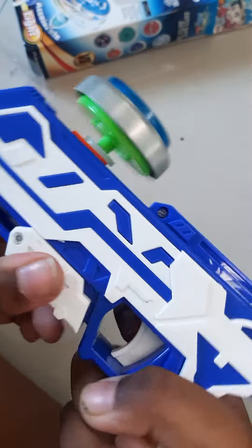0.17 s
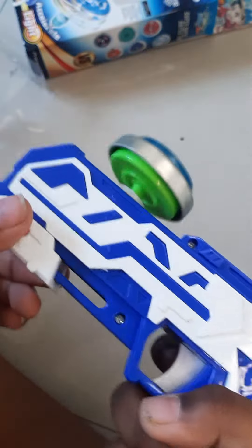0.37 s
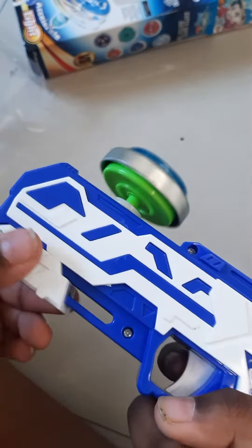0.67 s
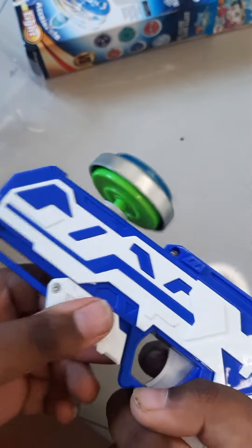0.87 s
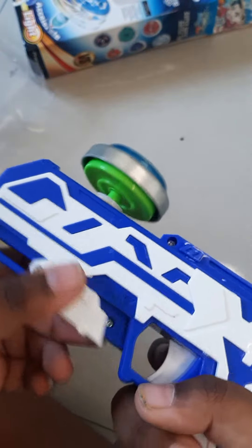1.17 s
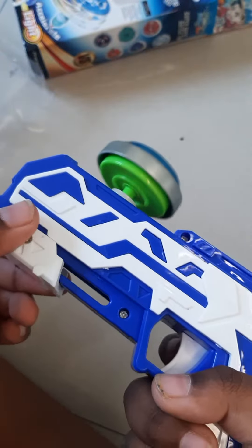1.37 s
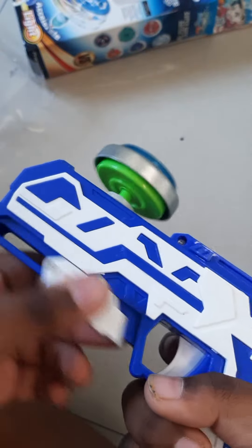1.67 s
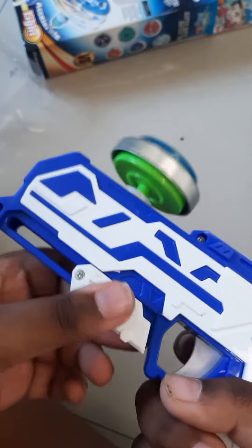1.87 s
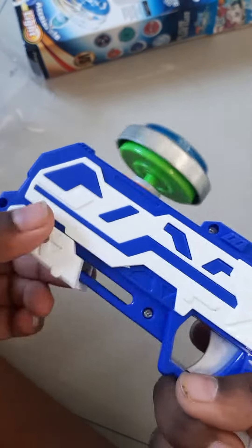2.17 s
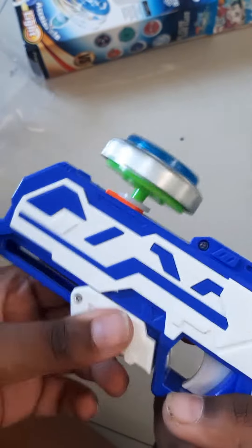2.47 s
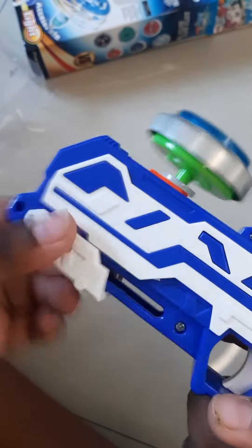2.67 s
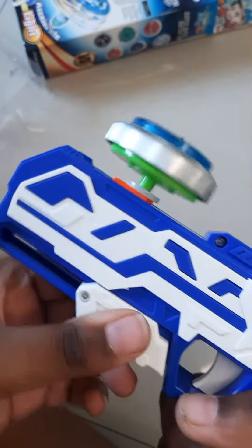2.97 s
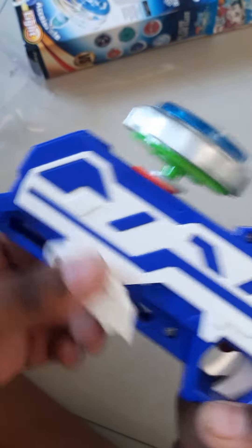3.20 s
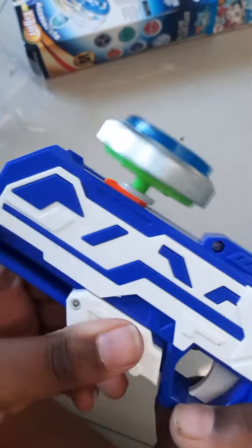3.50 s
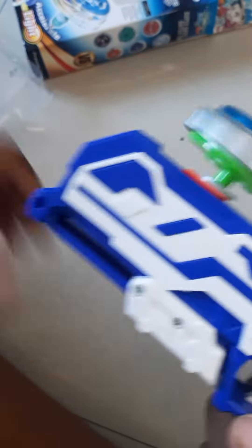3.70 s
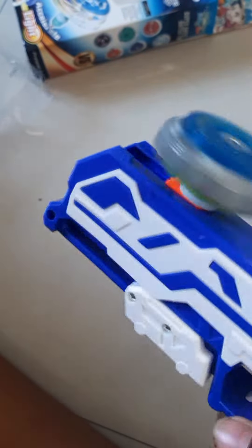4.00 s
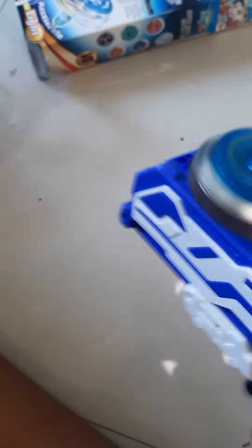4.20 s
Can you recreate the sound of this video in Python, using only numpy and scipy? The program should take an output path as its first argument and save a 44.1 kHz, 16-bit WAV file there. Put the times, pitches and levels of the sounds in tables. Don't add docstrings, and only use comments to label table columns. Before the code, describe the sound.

Close, bright plastic gear grinding and sharp knocks come in quick alternating strokes over the continuous fluttering rattle of a fast spinning top.

```python
import sys
import numpy as np
from scipy import signal
from scipy.fft import rfft, irfft
from scipy.io import wavfile
from scipy.ndimage import uniform_filter1d

SR = 44100
rng = np.random.default_rng(int(sys.argv[2]) if len(sys.argv) > 2 else 0)


def volts_from_decibels(level):
    exponent = np.asarray(level, float) / 20
    return 10 ** exponent


def dump(signal):
    limited = np.clip(np.atleast_2d(signal).T, -1, 1)
    pcm = np.round(limited * 32767).astype(np.int16)
    wavfile.write(sys.argv[1], SR, pcm)


N = 191658

# f/Hz, level per Hz/dB
GEAR_RING = [(400, -24), (900, -14), (1600, -2.5), (2500, 3.5), (4300, 0.5), (7200, 0), (8500, 1.5),
             (11500, -9), (15700, -18)]
# f/Hz, width/Hz, height/dB
RIM_MODES = [(2650, 300, 4), (4880, 380, 8), (5820, 300, 7), (6800, 300, 3), (12000, 500, 2)]
# start/s, stop/s, grind level at start/dB, grind level at stop/dB
PULL_STROKES = [
    (.71, .872, -29.5, -22),
    (1.59, 1.738, -27.5, -21),
    (2.283, 2.406, -27.5, -23),
    (2.865, 2.999, -26, -27.5),
    (3.379, 3.501, -24, -28),
]

PORT_LAG_S = 0.00016
SPOTS = 6
ECHO_DB = -29


def rms_one(x):
    return x / np.sqrt(np.mean(x ** 2) + 1e-20)


def in_time(rows):
    s, *columns = np.transpose(rows)
    t = np.arange(N) / SR
    return [np.interp(t, s, column) for column in columns]


def at_hz(points, hz):
    point_hz, value = np.array(points).T
    return np.interp(np.log(hz + 1), np.log(point_hz), value)


def humps(modes, hz):
    return sum(db / (1 + (2 * (hz - centre) / width) ** 2) for centre, width, db in modes)


def causal(level_db):
    cepstrum = irfft(level_db * np.log(10) / 20)
    half = len(cepstrum) // 2
    cepstrum[1:half] *= 2
    cepstrum[half + 1:] = 0
    return np.exp(rfft(cepstrum))


def two_ports(mid, side, hz, lag_s):
    # f/Hz, likeness (0 to 1)
    likeness = [(40, 0.067), (130, 0.95), (500, 0.82), (1500, 0.93), (2300, 0.79), (3300, 0.75),
                (5500, 0.1), (14000, 0.093)]
    # f/Hz, extra lag/rad
    shadow = [(1700, -0.081), (2250, 0.37), (3000, -0.47), (3900, -0.18), (4600, 0.23)]
    alike = np.clip(at_hz(likeness, hz), 0, 1)
    shared, unlike = np.sqrt(1 + alike) * mid, np.sqrt(1 - alike) * side
    lag_rad = 2 * np.pi * hz * lag_s + (lag_s > 0) * at_hz(shadow, hz)
    return np.array([shared + unlike, (shared - unlike) * np.exp(-1j * lag_rad)])


def shell(clicks, level_db, ring_s, size=8192):
    t = np.arange(size) / SR
    hz = np.arange(size // 2 + 1) * SR / size
    echo = volts_from_decibels(ECHO_DB - 60 * t / 0.27) * np.clip(t / 0.01, 0, 1)
    dying = volts_from_decibels(-60 * t / ring_s) + echo
    out = 0
    for spot in clicks:
        mid, side = rfft(rng.standard_normal((2, size)) * dying)
        ports = two_ports(mid, side, hz, PORT_LAG_S)
        power = np.mean(abs(ports) ** 2, axis=0)
        broad_db = 10 * np.log10(uniform_filter1d(power, size=60))
        colour = causal(level_db(hz) - broad_db)
        out = out + signal.oaconvolve(spot[None], irfft(ports * colour), axes=1)[:, :N]
    return out / np.sqrt(np.mean(volts_from_decibels(level_db(hz)) ** 2))


def grains(per_s, spread_db):
    sizes = volts_from_decibels(spread_db * np.minimum(rng.exponential(1, N), 3.0)) * rng.choice([-1, 1], N)
    born = rng.random(N) < per_s / SR
    dealt = rng.integers(0, SPOTS, N) == np.arange(SPOTS)[:, None]
    return rms_one(sizes * born) * dealt


def slow(rate_hz):
    z = rng.standard_normal(N) + 1j * rng.standard_normal(N)
    z = signal.sosfilt(signal.butter(2, rate_hz, fs=SR, output="sos"), z)
    return z / np.sqrt(np.mean(abs(z) ** 2))


def split(x, low_gain, high_gain):
    out = 0
    parts = ((2700, "low", low_gain), ((2700, 8300), "band", 1), (8300, "high", high_gain))
    for hz, kind, gain in parts:
        band = signal.butter(2, hz, kind, fs=SR, output="sos")
        out = out + signal.sosfilt(band, x * gain + 1e-18)
    return out


def strokes_in_time(tables, silent):
    rows = []
    for table in tables:
        first, last = table[0], table[-1]
        rows += [(first[0] - 0.004, *silent(first)), *table, (last[0] + 0.011, *silent(last))]
    return in_time(rows)


def spinning_top():
    # t/s, turns made so far
    spin = [(0, -0.13), (.2248, 10), (.6156, 25), (.734, 30), (1.0526, 45), (1.1637, 50), (1.6353, 70),
            (1.7467, 75), (1.9479, 85), (2.1757, 95), (2.3862, 105), (2.6723, 120), (2.9683, 135),
            (3.2297, 150), (3.502, 165), (3.7578, 180), (4.0268, 195), (4.35, 212.08)]
    # t/s, rattle level/dB, depth of the once-a-turn beat/dB
    looseness = [
        (0.0, -39, 13.5),
        (0.52, -41, 10),
        (1.5, -40.5, 12),
        (1.8, -36.5, 12),
        (2.15, -39, 12.5),
        (2.52, -40.5, 12.5),
        (3.1, -39.5, 10),
        (3.69, -40.5, 12),
        (3.95, -36.5, 8.5),
        (4.35, -34, 8.5),
    ]
    # f/Hz, level per Hz/dB
    top_ring = [(500, -18), (1000, -8), (1700, -8.5), (2300, -4.5), (3500, 0.5), (4500, -2), (6800, -1),
                (8400, -3.5), (12000, -16), (15700, -22.5)]
    turns, = in_time(spin)
    level_db, beat_db = in_time(looseness)
    turn = np.floor(turns + 0.5).astype(int)
    chance = rng.standard_normal((turn[-1] + 1, 2))[turn]
    late_turns, wander_db = 0.04 * chance[:, 0], 1.2 * chance[:, 1]
    beat = np.exp(1.6 * (np.cos(2 * np.pi * (turns - late_turns)) - 1))
    rub = grains(6000, spread_db=4.5) * volts_from_decibels(beat * (beat_db + wander_db) - 0.23 * beat_db)
    sound = shell(rub, lambda hz: at_hz(top_ring, hz) + humps(RIM_MODES, hz), ring_s=0.0043)
    highs = signal.sosfilt(signal.butter(4, 8500, "high", fs=SR, output="sos"), sound)
    return volts_from_decibels(level_db + 5.0) * (sound + (volts_from_decibels(6.5) - 1) * highs)


def stroke_shape(start, stop, first_db, last_db, sag_db, low_db):
    grind_low_db, stop_low_db, coast_low_db = -12.5, -9, -13.5
    middle_db = (first_db + last_db) / 2 + sag_db
    return [(start, first_db - 1.0, grind_low_db),
            (start + 0.0077, first_db, grind_low_db + low_db),
            ((start + stop) / 2, middle_db, grind_low_db + low_db),
            (stop, last_db, stop_low_db),
            (stop + 0.011, last_db - 5.5, coast_low_db),
            (stop + 0.095, last_db - 34.5, coast_low_db)]


def stroke():
    # start/s, stop/s, grind level at start/dB, grind level at stop/dB
    pushes = [
        (-.03, 0.018, -28, -19),
        (0.244, 0.408, -30, -21.5),
        (1.194, 1.324, -22.5, -20),
        (1.965, 2.056, -32, -20),
        (2.614, 2.717, -28, -24),
        (3.189, 3.276, -26.5, -28),
    ]
    shapes = [stroke_shape(*row, sag_db=1, low_db=2.0) for row in pushes]
    shapes += [stroke_shape(*row, sag_db=-2, low_db=-1.0) for row in PULL_STROKES]
    grind_db, low_db = strokes_in_time(sorted(shapes), lambda row: (-70, row[2]))
    clumps = volts_from_decibels(4.3 * np.clip(np.real(slow(47)), -2.5, 0.6))
    rub = grains(4000, spread_db=9.5) * clumps * volts_from_decibels(grind_db + 5.0)
    rub = split(rub, volts_from_decibels(low_db + 10.5), volts_from_decibels(-2.5))
    return shell(rub, lambda hz: at_hz(GEAR_RING, hz) + 0.017 * humps(RIM_MODES, hz), ring_s=0.025)


def mesh_shape(start, stop, s, hz, db):
    fall_hz_per_s, rise_hz_per_s = 2800.0, 2900
    start, stop = max(start, s - 0.08), max(stop, s + 0.01)
    return [(start, hz + fall_hz_per_s * (s - start), db - 7),
            (s, hz, db),
            (stop, hz + rise_hz_per_s * (stop - s), db + 0.5)]


def mesh():
    # t of slowest moment/s, mesh f there/Hz, level there/dB
    songs = [
        (.792, 1635, -33),
        (1.73, 1413, -39),
        (2.395, 1515, -29.5),
        (2.93, 1460, -33),
        (3.44, 1570, -32.5),
    ]
    shapes = [mesh_shape(*pull[:2], *song) for pull, song in zip(PULL_STROKES, songs)]
    hz, level_db = strokes_in_time(shapes, lambda row: (row[1], -80))
    phase = 2 * np.pi * np.cumsum(hz) / SR
    phase = np.array([phase, phase - 2 * np.pi * hz * PORT_LAG_S])
    first = (0.3 + slow(90)) * np.exp(1j * phase)
    second = volts_from_decibels(-3.5) * slow(250) * np.exp(1.4j * phase)
    return volts_from_decibels(level_db + 4) * np.real(first + second)


def jolts():
    # t of crest/s, level/dB, chatter length/ms
    skips = [(.274, -12.5, 4.6), (.314, -11.5, 12), (.33, -0.5, 2.6), (.3518, -1, 7.4), (.3649, -4, 9.4),
             (.3866, -2, 5), (1.2062, -9, 7.7), (1.2352, -6.5, 5.7), (1.2462, -7.5, 5), (1.2637, -7.5, 6.1),
             (1.284, -5, 2.8), (1.2953, -2, 5.9), (1.9925, -12.5, 14), (2.013, -5.5, 7.6),
             (2.0395, -5, 6.5), (2.0504, -10, 1.8), (2.6355, -8, 4.9), (2.6501, -9, 5.6), (2.669, -9, 4.7),
             (3.2021, -18.5, 8.1), (3.2429, -15.5, 13), (3.2672, -12, 5.3), (.7955, -10, 2.9),
             (.84, -28, 5.1), (1.6665, -22, 1.3), (1.707, -39, 2.3), (2.884, -8.5, 8.6), (3.3948, -8.5, 4),
             (3.4075, -5.5, 9)]
    # t of crest/s, level/dB, chatter length/ms
    knocks = [(.023, -5.5, 4.2), (.2465, -7.5, 3.6), (.4046, -6, 14), (.6888, -11.5, 2.6),
              (.7259, -10, 5.2), (.879, -9, 4.3), (1.1898, -7.5, 2.7), (1.3185, -4.5, 4.4),
              (1.3259, -1.5, 4.2), (1.3493, -11, 8.6), (2.258, -16, 4.5), (1.5905, -11, 5.4),
              (1.7423, -5.5, 7.8), (1.9798, -5.5, 11), (2.0588, -3, 3.5), (2.066, -3.5, 5.2),
              (2.295, -10.5, 9), (2.3012, -8.5, 10), (2.4079, -4.5, 4.2), (2.617, -20, 6.7),
              (2.6937, 1.5, 5.2), (2.7045, -6, 14), (2.8696, -11, 3), (3.007, -7.5, 4.2),
              (3.179, -17.5, 8.4), (3.2813, -4, 7.7), (3.2999, -9, 3), (3.3772, -10.5, 4.2),
              (3.4997, -8.5, 4.9)]
    # t of crest/s, level/dB, chatter length/ms
    slaps = [(.0892, -15.5, 6), (.136, -11, 2), (.2, -22, 2.9), (.5838, -10.5, 2.8), (.9462, -16.5, 6.9),
             (1.0313, -13, 1.1), (1.076, -16, 4.8), (1.1378, -15.5, 4.3), (1.3808, -17, 3),
             (1.5229, -19.5, 6.4), (1.867, -11, 3.3), (1.8865, -19, 4), (1.9087, -19, 8.7),
             (1.9267, -24, 5.1), (1.9444, -17, 3.5), (2.2755, -14, 9.1), (2.52, -34, 2.6),
             (2.536, -20.5, 10.4), (3.0251, -15, 6.5), (3.039, -18, 9.2), (3.0578, -17, 7.4),
             (3.5367, -17, 14), (3.6745, -12.5, 3.5), (3.71, -24, 13), (3.842, -19, 7.6), (4.044, -17, 4.2),
             (4.0642, -10.5, 5.9), (4.1359, -34, 2.3), (4.2333, -14.5, 6.3)]
    kinds = ((skips, (-12.5, -10.5)), (knocks, (-10.5, -10)), (slaps, (-13.5, -11)))
    table = sorted((*row, *colour) for rows, colour in kinds for row in rows)
    span = np.arange(-300, 700) / SR
    clicks, shares = np.zeros((SPOTS, N + 1000)), np.ones((2, 1, N + 1000))
    draws = rng.standard_normal((len(table), 3, len(span)))
    for k, (s, db, ms, low_db, bright_db) in enumerate(table):
        width = np.clip(ms, 1, 12) / 1000 * np.where(span < 0, 0.17, 0.5)
        at = np.arange(len(span)) + round(s * SR)
        shape = np.exp(-(span / width) ** 2)
        contacts = draws[k, 0] * (draws[k, 1] > 0.45) * shape
        even = np.sqrt(np.sum(shape ** 2) / np.sum(contacts ** 2))
        spot = (k + (draws[k, 2] > 0)) % SPOTS
        clicks[spot, at] += volts_from_decibels(db + 0.47) * contacts * even
        chance_db = 2.0 * draws[k, :2, :1]
        shares[:, 0, at[150:]] = volts_from_decibels([[low_db + 9], [bright_db + 9.0]] + chance_db)
    ahead = slice(330, 330 + N)
    rub = split(clicks[:, ahead], shares[0][:, ahead], shares[1][:, ahead])
    return shell(rub, lambda hz: at_hz(GEAR_RING, hz) + 0.28 * humps(RIM_MODES, hz), ring_s=0.005)


def taps():
    # t/s, peak level/dB, f/Hz
    hits = [
        (3.88, -26.5, 1670),
        (3.898, -28.5, 1700),
        (4.247, -14.5, 2260),
        (4.281, -23, 945),
    ]
    out, t = np.zeros((2, N)), np.arange(1500) / SR
    for s, db, hz in hits:
        for port in range(2):
            late = np.clip(t - port * PORT_LAG_S, 0, None)
            ring = volts_from_decibels(db - 60 * late / 0.025) * np.sin(2 * np.pi * hz * late)
            out[port, round(s * SR):][:len(t)] += ring
    return out


def room():
    # f/Hz, level/dB
    far_colour = [(35, -44), (60, -10.5), (260, -2), (387, 5), (542, -3), (601, 4), (854, -6.5), (1730, 1),
                  (2000, -12), (2600, -67), (4400, -120)]
    # f/Hz, rms level/dB
    motor = [(199.2, -63), (398.4, -67.5), (597.5, -87)]
    # t/s, rumble level/dB, width/s
    handling = [
        (1.2, -58, 0.26),
        (1.8, -53, 0.36),
        (2.66, -50, .05),
        (3.55, -53, 0.14),
        (4.0, -51, 0.031),
        (4.25, -56.5, 0.42),
    ]
    # t/s, change/dB
    swell = [
        (0, 1.5),
        (2.4, 1.5),
        (2.8, -1.5),
        (3.8, -2.5),
        (4.35, 3),
    ]
    hz, t = np.arange(N // 2 + 1) * SR / N, np.arange(N) / SR
    change_db, = in_time(swell)
    grip = volts_from_decibels(-71.5) + sum(volts_from_decibels(db) * np.exp(-((t - s) / width) ** 2) for s, db, width in handling)
    mid, side = rfft(rng.standard_normal((2, N))) * volts_from_decibels(at_hz(far_colour, hz))
    wobble = np.cumsum(rng.standard_normal(N)) * 0.0122
    hum = sum(np.sqrt(2) * volts_from_decibels(db) * np.sin(2 * np.pi * f * t + wobble * f / 200) for f, db in motor)
    rumble_band = signal.butter(2, [55, 150], "band", fs=SR, output="sos")
    rumble = signal.sosfilt(rumble_band, rng.standard_normal((2, N)))
    far = volts_from_decibels(-47.5) * rms_one(irfft(two_ports(mid, side, hz, 0), N))
    return volts_from_decibels(change_db) * (far + hum) + grip * rms_one(rumble)


def scene():
    toy = spinning_top() + stroke() + mesh() + jolts() + taps()
    return toy + room()


def band_limit(x):
    return signal.sosfilt(signal.butter(12, 16970, fs=SR, output="sos"), x)


def record(dry):
    highs = signal.sosfilt(signal.butter(2, 7500, "high", fs=SR, output="sos"), dry)
    x = dry + highs * [[0.15], [-0.15]]
    ceiling = 0.86
    x = ceiling * np.tanh(x / ceiling)
    x = signal.sosfilt(signal.butter(2, 55, "high", fs=SR, output="sos"), x)
    x = signal.sosfilt(signal.cheby2(12, 45, 16200, fs=SR, output="sos"), x)
    return band_limit(x)


dry = scene()
out = record(dry)
dump(out)
```